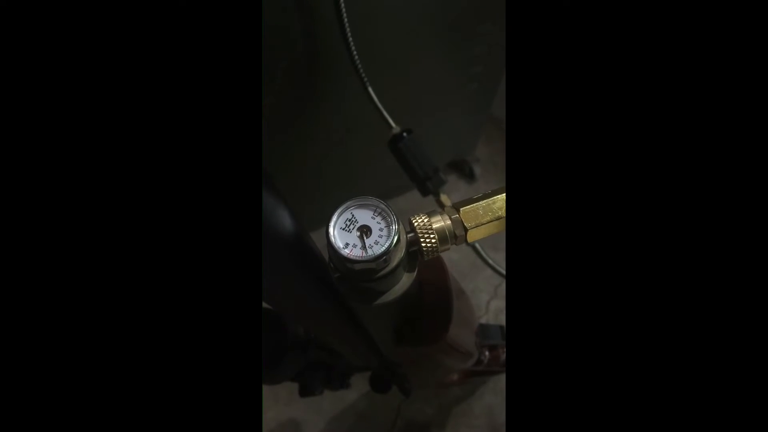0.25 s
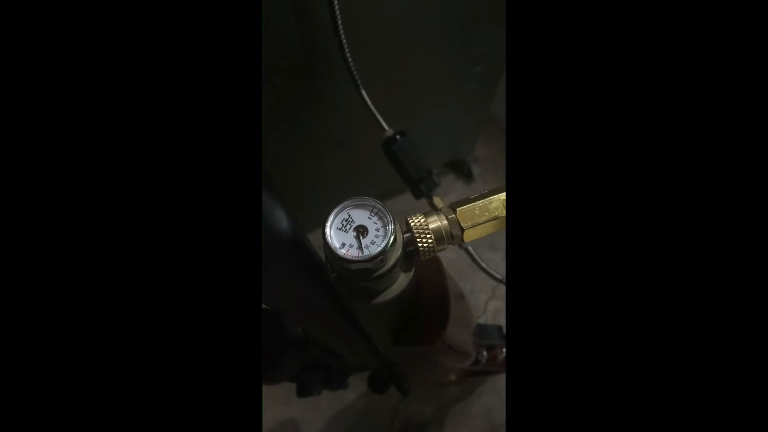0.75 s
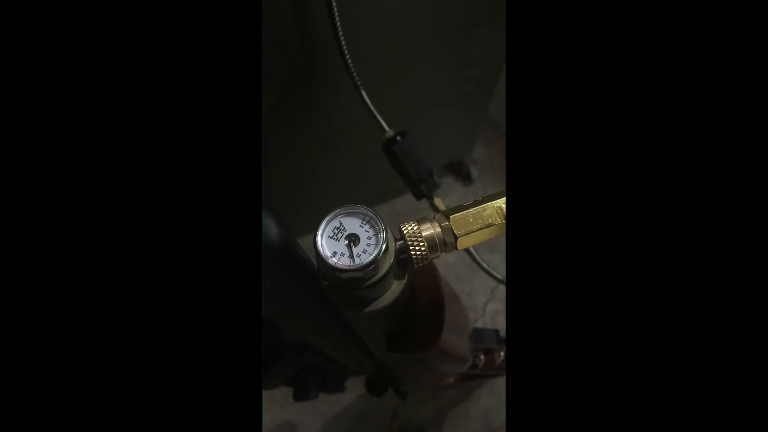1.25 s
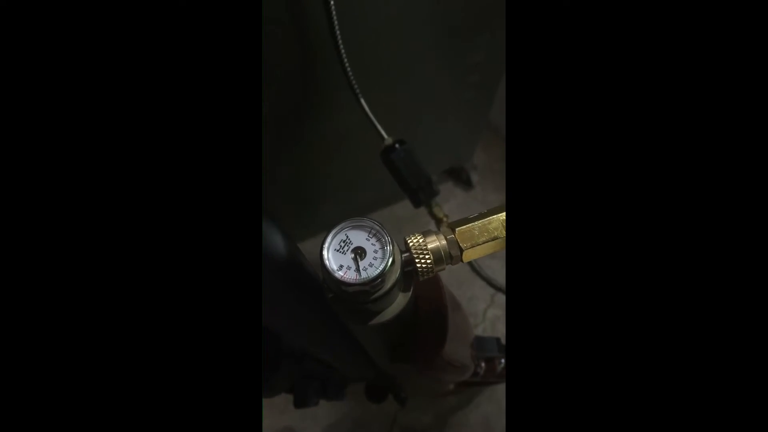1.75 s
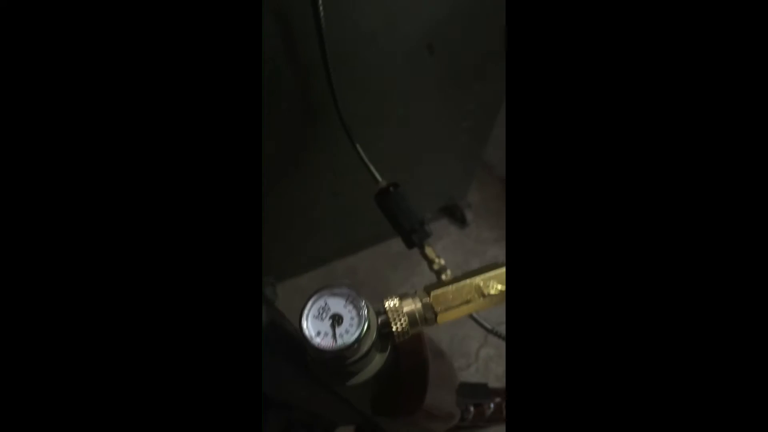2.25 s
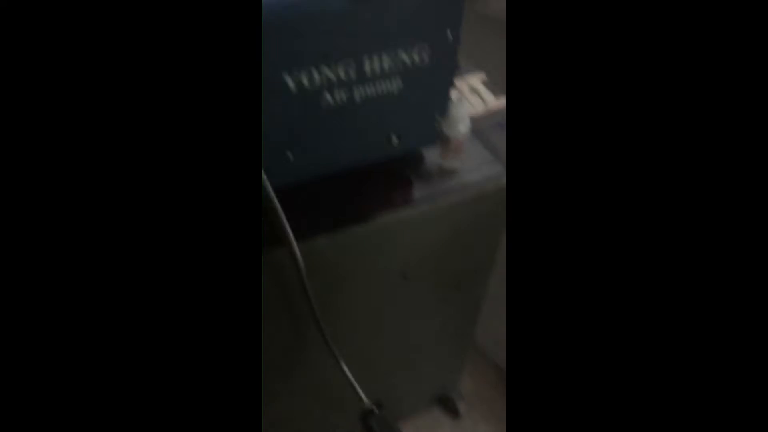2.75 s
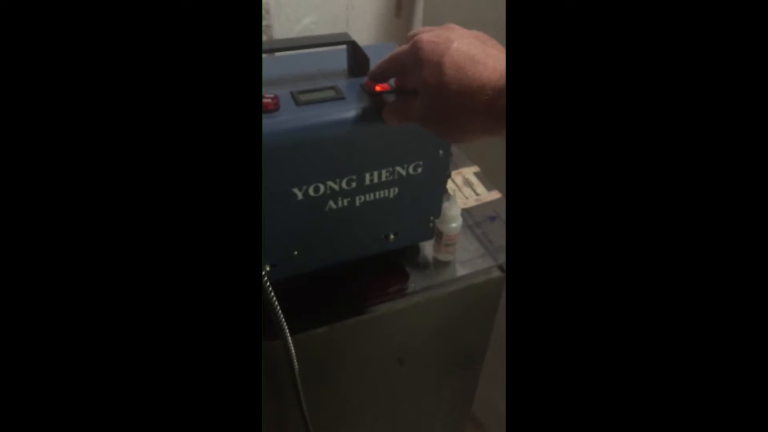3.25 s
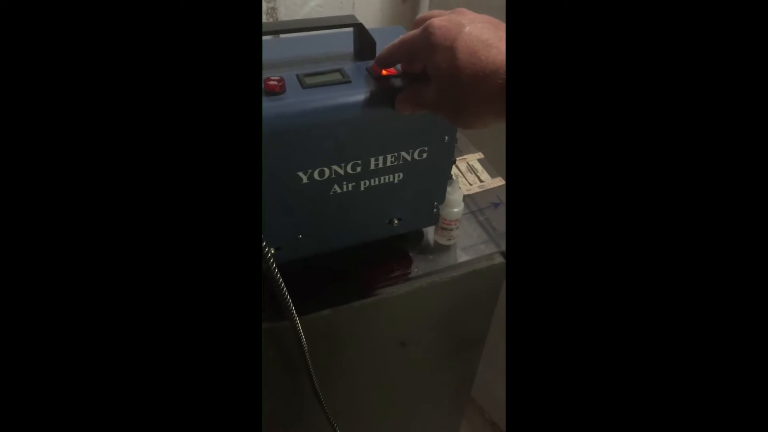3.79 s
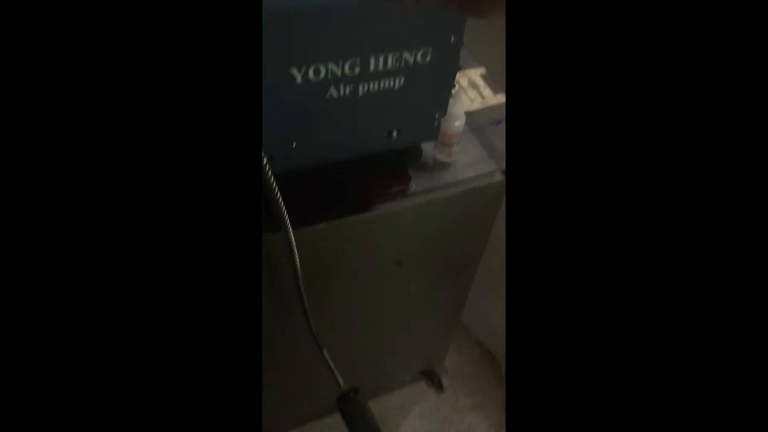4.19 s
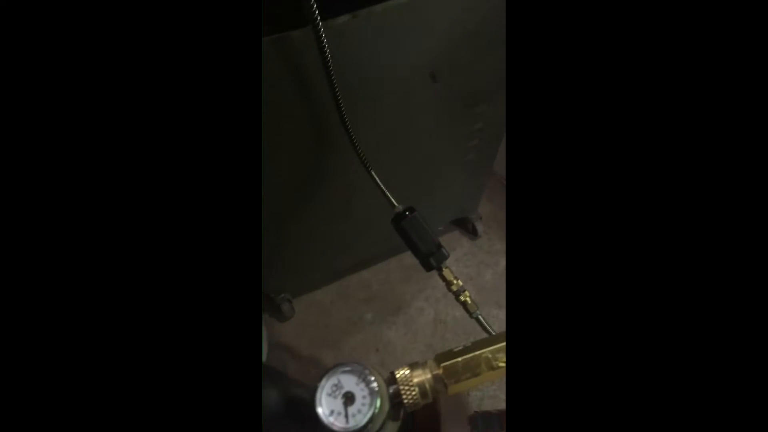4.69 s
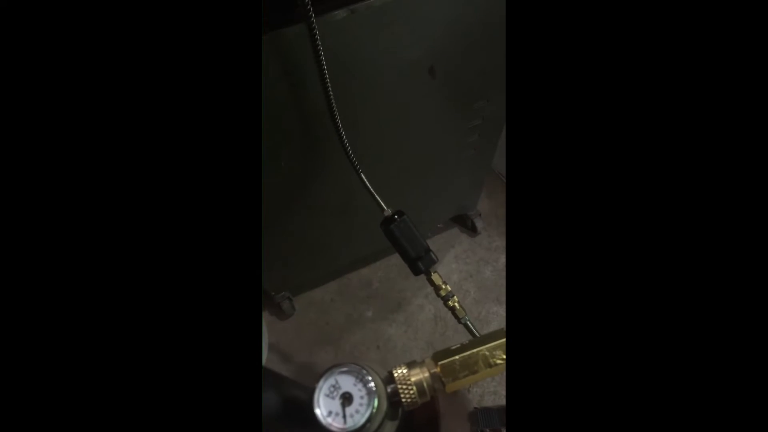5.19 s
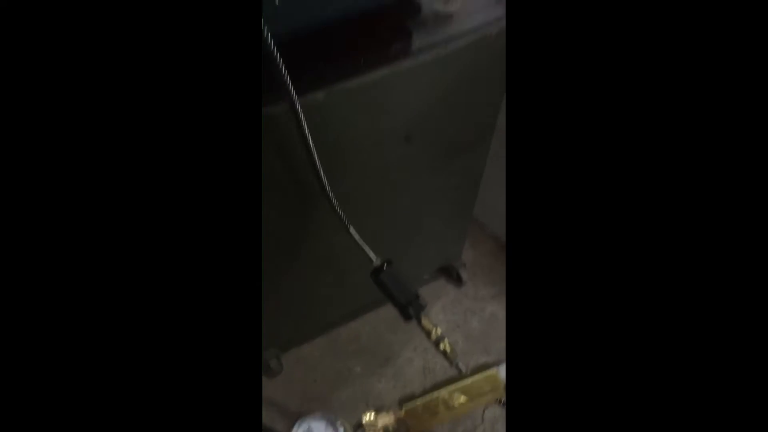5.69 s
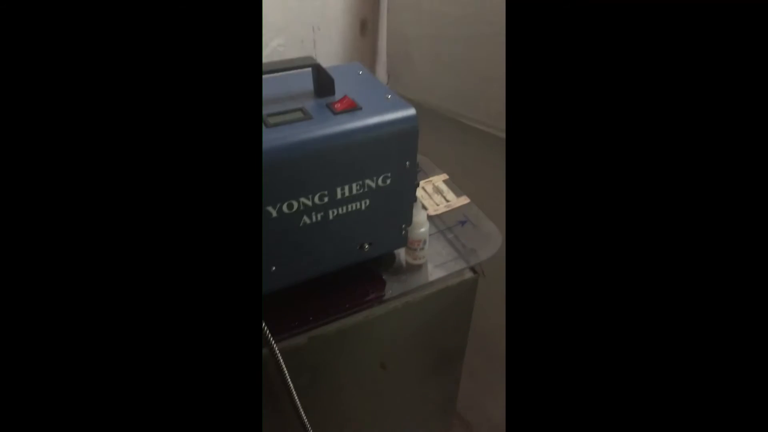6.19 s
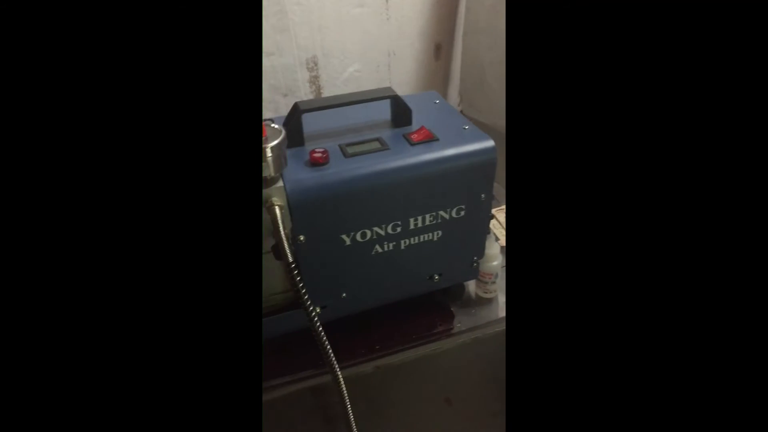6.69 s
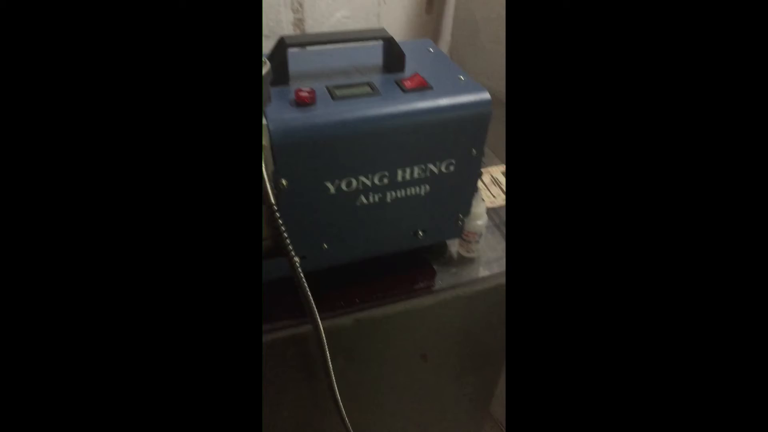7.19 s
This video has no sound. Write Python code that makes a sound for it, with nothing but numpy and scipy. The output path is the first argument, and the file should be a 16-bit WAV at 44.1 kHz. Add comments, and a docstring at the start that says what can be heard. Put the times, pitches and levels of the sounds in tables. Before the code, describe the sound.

A small high-pressure piston compressor runs at a fast, steady chug in a bare basement, with low droning, metallic knocking, buzz, clatter and hissing valves. The handheld microphone moves from the gauge to the switch and back toward the hose, subtly brightening and dulling the tone. Around five seconds the switch snaps; the machine shudders and thumps to rest. Soft scuffs, dry clicks and thin squeaks follow over low room hum.

```python
"""In a basement, a small high-pressure piston compressor runs, heard from its gauge and then from beside its switch.
Waves that repeat with each shaft turn make its push of air, drone, knock and buzz; pulsed noise makes
clatter, hiss and ticking valves. Switched off, it shudders to rest with fading noise and ringing thumps.
A few scuffs and clicks (short noise) and thin squeaks (gliding tones) follow over the hum of the room."""
import sys
import numpy as np
from scipy import signal
from scipy.fft import rfft, irfft, next_fast_len
from scipy.io import wavfile
from scipy.ndimage import map_coordinates

SR = 44100
rng = np.random.default_rng(int(sys.argv[2]) if len(sys.argv) > 2 else 0)


def waveform_to_disk(signal):
    """Save audio, clipped to [-1, 1], as 16-bit WAV at the path in sys.argv[1]."""
    frames = np.transpose(np.atleast_2d(signal))
    scaled = np.clip(frames, -1, 1) * 32767
    samples = np.round(scaled).astype(np.int16)
    wavfile.write(sys.argv[1], SR, samples)


N = 328104
TIME = np.arange(N) / SR  # seconds


def amp(db):
    """Turn decibels into gain."""
    return 10 ** (np.asarray(db) / 20)


def unit(x):
    """Scale x to an rms of 1."""
    return x / np.sqrt(np.mean(x ** 2) + 1e-20)


def along(points, hz):
    """Read a curve of (frequency, value) points on a log frequency axis."""
    f, v = np.transpose(points)
    return np.interp(np.log(hz + 1), np.log(f + 1), v)


def curves(rows):
    """Give one value per sample for each column after the time."""
    s, *cols = np.transpose(rows)
    return [np.interp(TIME, s, c) for c in cols]


def wobble(rate):
    """Draw a smooth random curve with `rate` knots a second."""
    knots = rng.standard_normal(int(N * rate / SR) + 4)
    return map_coordinates(knots, [TIME * rate])


def filtered(x, response):
    """Multiply the spectrum of x by a response of frequency."""
    size = next_fast_len(N + SR // 2)
    return irfft(rfft(x, size) * response(np.fft.rfftfreq(size, 1 / SR)), size)[:N]


def noise(spectrum):
    """Make noise of rms 1 with the given colour."""
    return unit(filtered(rng.standard_normal(N), lambda hz: amp(along(spectrum, hz))))


def ring(x, modes):
    """Let x excite (centre Hz, width Hz, dB) resonances, and scale the result to rms 1."""
    def response(f):
        return sum(amp(db) * 1j * f * width / (centre ** 2 - f * f + 1j * f * width)
                   for centre, width, db in modes)
    return unit(filtered(x, response))


def strikes(events, t60):
    """Envelope of sudden blows, each falling by 60 dB in t60 seconds."""
    return sum(amp(db - 60 * np.maximum(TIME - s, 0) / t60) * (TIME >= s) for s, db in events)


SHAFT_HZ = 55.5  # average turns a second under load
HUNT_HZ, HUNT_DEPTH_HZ = 9, .12  # how often and how far the speed swings
OFF_S, STOP_S = 5.062, 5.62  # power is cut; shaft stands still
VALVE_S = 3.2105  # a moment at which the first valve closes: the turn count is zero here


def shaft():
    """Turns made so far: the motor hunts slightly against the mains, then coasts to a stop."""
    speed = SHAFT_HZ + HUNT_DEPTH_HZ * np.sin(2 * np.pi * HUNT_HZ * TIME)
    slowing = np.clip((STOP_S - TIME) / (STOP_S - OFF_S), 0, 1)
    turns = np.cumsum(speed * slowing) / SR
    return turns - np.interp(VALVE_S, TIME, turns)


def each_turn(turns, at, decay, scatter_db, rise=.025):
    """Envelope struck once a turn, with rise and decay in shares of a turn and uneven strength."""
    count, since = np.divmod(turns - at + rise, 1)
    count = (count - count.min()).astype(int)
    strength = amp(scatter_db * rng.standard_normal(count.max() + 1))[count]
    return strength * np.exp(-(since - rise) / decay) * (1 - np.exp(-(since / rise) ** 2))


def repeating(turns, k, levels_db, nearness, at, scatter, size=4096):
    """Repeat one wave per turn, adding shaft multiples k aligned near one angle and mixing the places."""
    k = np.round(k)[:, None]
    angle = np.arange(size + 1) / size
    phase = scatter * rng.uniform(-1.064, 1, k.shape)  # a wide scatter spreads the wave over the turn
    cycles = amp(levels_db) @ np.sin(2 * np.pi * k * (angle - at) + phase)
    return sum(share * np.interp(turns % 1, angle, cycle) for share, cycle in zip(nearness, cycles))


# low push of air: (multiple of shaft speed, level at gauge [dB], level at switch [dB], level by hose [dB])
AIR_PUSH = [(1, -39, -42, -39.5), (2, -22, -22, -21.5), (3, -19, -18.5, -18.5), (4, -21.5, -20, -21.5),
            (5, -22.5, -20, -21.5), (6, -23.5, -36, -28.5), (7, -28.5, -20.5, -22.5)]


def air_push(turns, nearness):
    """Each stroke pushes air: the lowest multiples of the shaft speed, lined up near one angle."""
    multiples, *levels_db = np.transpose(AIR_PUSH)
    return repeating(turns, multiples, levels_db, nearness, at=.43, scatter=.65)


# resonances of the frame:
# (frequency [Hz], width [Hz], level at gauge [dB], level at switch [dB], level by hose [dB])
FRAME_MODES = [(510.6, 91, -29, -31.0, -30.5), (646, 60.0, -31.5, -28, -29.5),
               (801.7, 54.6, -24, -27.5, -25), (945, 120, -25, -24, -27.0), (1047, 92, -24, -30, -22.0),
               (1237, 76, -19, -25.5, -23.5), (1332.0, 110, -29.5, -33.5, -25.5),
               (1464, 130, -33, -30, -40.5), (1592, 60.0, -20.0, -26.5, -29.5),
               (1691, 52, -31.5, -20.5, -23.5), (1900, 87, -31.5, -29.5, -31)]


def frame_levels(k):
    """Level in dB of shaft multiples k at each place: those near a frame resonance stand out."""
    modes = np.array(FRAME_MODES)
    detune = (k * SHAFT_HZ - modes[:, :1]) / (modes[:, 1:2] / 2)
    return 10 * np.log10(amp(modes[:, 2:].T) ** 2 @ (1 + detune ** 2) ** -2.)


def frame_drone(turns, nearness, multiples):
    """The frame drones at shaft multiples spread loosely over the turn."""
    return repeating(turns, multiples, frame_levels(multiples), nearness, at=0.4976, scatter=np.pi)


def piston_knock(turns, nearness, multiples):
    """The piston excites higher frame tones, with slightly uneven timing and strength."""
    loose = turns + 0.0013 * wobble(70)  # play in the bearings shifts each knock a little
    wave = repeating(loose, multiples, frame_levels(multiples), nearness, at=.23, scatter=1.91)
    return wave * amp(1.2 * wobble(60))


# colour of the casing's buzz: (frequency [Hz], relative level [dB])
BUZZ_COLOUR = [(2000, -0.5), (2500, 3), (3100, -6.5), (3700, -10.5), (4600, -11.5), (6000, -20.5),
               (8000, -16)]


def casing_buzz(turns, nearness, multiples):
    """The casing buzzes at many high shaft multiples of random strength, unsteady in time and level."""
    spread_db = rng.uniform(-14, 9.7, (len(nearness), len(multiples)))
    levels_db = along(BUZZ_COLOUR, multiples * SHAFT_HZ) + spread_db
    unsteady = turns + 0.00048 * wobble(60)
    wave = unit(repeating(unsteady, multiples, levels_db, nearness, at=.5, scatter=np.pi))
    return amp(-28.5 + 2.0 * wobble(40)) * wave


def note(turns, nearness, count=16, order=37):
    """The periodic sound: push, drone, knock and buzz share out the multiples of the shaft speed."""
    low = np.arange(len(AIR_PUSH) + 1, count)
    middle = np.arange(count, order)
    high = np.arange(order, 4 * order)
    return (air_push(turns, nearness) + frame_drone(turns, nearness, low)
            + piston_knock(turns, nearness, middle) + casing_buzz(turns, nearness, high))


# colour of the loose parts: (frequency [Hz], relative level [dB])
CLATTER_COLOUR = [(40, -20.5), (100, -9.5), (220, -4), (600, -7.5), (950, -3), (1600, 1.5), (2000, -7),
                  (2700, -6), (4500, -21.5), (9000, -25), (16000, -43.5)]


def clatter(turns, close):
    """The piston shakes loose parts: noise that swells once a turn."""
    shake = 0.99 + each_turn(turns, at=0.14, decay=0.53, scatter_db=1.3, rise=0.11)
    return amp(-23.0 + close) * unit(shake * noise(CLATTER_COLOUR))


# ringing of the valve plates: (frequency [Hz], width [Hz], relative level [dB])
VALVE_MODES = [(6675, 56, 5.5), (6725, 50, -5.5), (6830, 44, 2), (5700, 81, -12), (8850, 430, -23)]
# valve blows within a turn: (share of a turn, relative level [dB])
VALVE_BLOWS = [(.0, -6.5), (.23, -6.5), (.5, -16)]


def valve_ring(turns, blows):
    """The plates snap shut at the same shaft angles every turn, and escaping air keeps them ringing."""
    snaps = sum(amp(db) * np.diff(np.floor(turns - at), prepend=np.floor(turns[0] - at))
                for at, db in VALVE_BLOWS)
    struck = ring(snaps * amp(1.0 * wobble(55)), VALVE_MODES)
    blown = ring(blows * rng.standard_normal(N), VALVE_MODES)
    return unit(struck + .45 * blown)


# colour of escaping air: (frequency [Hz], relative level [dB])
HISS_COLOUR = [(1500, -21.5), (3500, 4), (4800, -5.5), (5600, 5), (7500, -5), (9000, 2), (10300, -9.5),
               (12500, -6), (14000, -13.5), (16000, -14.5)]


def valve_sounds(turns, close):
    """Air hisses past the valves in bursts each turn, and the plates ring."""
    blows = sum(amp(db) * each_turn(turns, at=at, decay=0.1, scatter_db=3.0) for at, db in VALVE_BLOWS)
    leak_db = .7 * wobble(16)  # the valves never seat quite alike
    hiss = amp(-31.5 + 3.3 * close + leak_db) * unit((.6 + blows) * noise(HISS_COLOUR))
    ringing_db = -36.0 + 6.4 * close + leak_db + 0.52 * wobble(6.7)
    return hiss + amp(ringing_db) * valve_ring(turns, blows)


# where the listener is: (time [s], place: 0 at the gauge, 1 at the switch, 2 low by the hose)
LISTENER_PLACE = [(0, 0.085), (2.15, 0.052), (2.9, 1), (4.15, 0.85), (4.6, 1.97)]


def compressor(turns):
    """The machine under load, blended between listening places; its sound collapses at power-off."""
    place = np.clip(curves(LISTENER_PLACE)[0], 0, 2)
    nearness = [np.maximum(1 - np.abs(place - i), 0) for i in range(3)]
    close = nearness[1] + .5 * nearness[2]  # clatter and valves grow near the cylinder
    since_off = np.maximum(TIME - OFF_S, 0)
    steady = note(turns, nearness) + valve_sounds(turns, close)
    return steady * amp(-280 * since_off) + clatter(turns, close) * amp(-200 * since_off)  # dB/s


# colour of the room's rumble: (frequency [Hz], relative level [dB])
ROOM_COLOUR = [(20, -35.5), (50, -10.5), (90, -13.5), (160, -9), (240, -9.5), (340, -10.5), (430, -22),
               (800, -24.5), (1100, -22.5), (2000, -29), (4000, -34.5), (8000, -39), (16000, -45.5)]
ROOM_DB, ROOM_RISE_S, ROOM_RISE_DB_PER_S = -62.5, 6.5, 6  # the rumble swells from that time on


def background():
    """Room rumble and boom from noise, a mains hum tone, and a whine strongest near the machine's stop."""
    hum = amp(-62.0 + 1.5 * wobble(4)) * np.sin(2 * np.pi * 59.5 * TIME)
    whine_db = -72 + 10 * np.exp(-((TIME - 5.71) / 0.17) ** 2)
    whine_noise = noise([(1200, -35.5), (2150, -0.5), (3500, -28)])
    whine = amp(whine_db) * ring(whine_noise, [(2180, 100, 0)])
    boom_noise = noise([(100, -12.5), (280, 0.0), (600, -23.5)])
    boom = amp(-63.5) * ring(boom_noise, [(235.0, 20, -0.5), (348, 25, -6)])
    room_db = ROOM_DB + ROOM_RISE_DB_PER_S * np.maximum(TIME - ROOM_RISE_S, 0)
    return amp(room_db + wobble(11)) * noise(ROOM_COLOUR) + hum + whine + boom


# the last piston knocks: (time [s], relative level [dB])
LAST_KNOCKS = [(5.125, -16.5), (5.203, -22), (5.2408, -23.5), (5.277, -22.5), (5.3424, -27.5),
               (5.4232, -23.5), (5.46, -34), (5.518, -40), (5.59, -42.5), (5.72, -48.5)]


def aftermath(rise, t60):
    """Motion that builds up after each knock and dies away (seconds); the knocks add in power."""
    s, db = np.transpose(LAST_KNOCKS)[:, :, None]
    since = np.maximum(TIME - s, 0)
    return np.linalg.norm(amp(db - 60 * since / t60) * (1 - np.exp(-since / rise)), axis=0)


SWITCH_S, SWITCH_DB = 5.0484, -23  # the snap of the switch
SIGH_DB, SIGH_DB_PER_S = -44, 110.5  # fading air after the power is cut
PUFF_DB, PUFF_RISE_S, PUFF_T60 = -29.5, 0.0068, .27  # air let out by each last stroke


def switch_and_air():
    """The switch snaps, air still sighs past the valves, and each last stroke lets out a puff."""
    snap = strikes([(SWITCH_S, SWITCH_DB)], t60=.06)
    sigh = amp(SIGH_DB - SIGH_DB_PER_S * np.abs(TIME - OFF_S)) * (TIME > OFF_S)
    puffs = amp(PUFF_DB) * aftermath(PUFF_RISE_S, PUFF_T60)
    return (snap + sigh + puffs) * noise(HISS_COLOUR)


# colour of the rocking machine: (frequency [Hz], relative level [dB])
SHUDDER_COLOUR = [(25, -37), (55, -14), (80, -9), (130, -6.5), (200, 1.5), (260, -4), (300, -12),
                  (370, -9.5), (500, -27), (1000, -69)]
SHUDDER_DB, SHUDDER_RISE_S, SHUDDER_T60 = -10.5, .024, 0.49


def shudder(jolt):
    """The jolt and each last knock leave the machine rocking on its feet: low noise that dies away."""
    rocking = amp(SHUDDER_DB) * aftermath(SHUDDER_RISE_S, SHUDDER_T60)
    return (rocking + amp(-3) * jolt) * noise(SHUDDER_COLOUR)


# colour of the rattling parts: (frequency [Hz], relative level [dB])
RATTLE_COLOUR = [(250, -22.5), (420, -2.5), (600, 2), (760, -1.5), (1000, -3), (1600, -5), (2750, -10.5),
                 (6000, -24.5), (12500, -40.5), (16000, -49)]
RATTLE_DB, RATTLE_RISE_S, RATTLE_T60 = -14, 0.0068, .32


def rattle(turns):
    """Loose parts rattle after each knock, pulsing with the slowing strokes."""
    strokes = 0.94 + each_turn(turns, at=0.17, decay=.3, scatter_db=5.0)
    loose = amp(RATTLE_DB) * aftermath(RATTLE_RISE_S, RATTLE_T60) * strokes
    direct = amp(-14) * strikes(LAST_KNOCKS, t60=0.048)
    return (loose + direct) * noise(RATTLE_COLOUR)


# the cabinet under the machine: (average frequency [Hz], average relative level [dB], 60 dB decay [s])
CABINET_MODES = [(82.6, -8, 0.5), (145, 0.5, 0.21), (208, -6.5, 0.37), (367, -8.5, .25), (741, 2, 0.076),
                 (1460, -15.5, 0.18)]
HEFT_DB, HEFT_DB_PER_S = -18.5, 31  # thump gain at switch-off; slower strokes shake the cabinet harder


def thumps(detune=0.048):
    """Each knock rings the cabinet as dying tones of slightly different strengths and pitches."""
    out, t = np.zeros(N), np.arange(SR) / SR
    for s, db in LAST_KNOCKS:
        modes = [amp(level + rng.normal(0, 1.1) - 60 * t / t60)
                 * np.sin(2 * np.pi * hz * rng.normal(1, detune) * t)
                 for hz, level, t60 in CABINET_MODES]
        out[round(s * SR):][:len(t)] += amp(db) * sum(modes) * (1 - np.exp(-t / 0.003))
    heft = amp(HEFT_DB + HEFT_DB_PER_S * (np.clip(TIME, OFF_S, 5.45) - OFF_S))
    return heft * out


def coasting(turns):
    """The switch snaps; the machine rocks and rattles while the last strokes slow down."""
    jolt = strikes([(OFF_S, -17.5)], t60=0.26)  # the load drops off and everything loose shakes
    return switch_and_air() + jolt * noise(CLATTER_COLOUR) + rattle(turns) + shudder(jolt) + thumps()


# scuffs: (start [s], swell [s], hold [s], relative level [dB])
SCUFF_EVENTS = [(5.741, 0.094, 0.02, -43), (5.938, .042, .017, -33.5), (7.202, 0.051, .076, -41.5)]
# colour of the rubbing: (frequency [Hz], relative level [dB])
RUBBING_COLOUR = [(350, -52), (600, -18), (1410, -3), (1530, -7.5), (1660, -1), (2570, 1), (4160, -2),
                  (4840, -1.5), (16000, -22.5)]
# resonances of the rubbed surface: (frequency [Hz], width [Hz], relative level [dB])
SURFACE_MODES = [(1427, 68, -1.5), (1730, 110, 1), (3268, 60, -6.5), (4120, 150, 1)]
SCUFF_T60 = .14  # seconds for a scuff to fall by 60 dB


def scuffs():
    """Rubbing makes soft noise with a fast, grainy flicker."""
    rub = sum(amp(db - 60 * np.maximum(TIME - s - swell - hold, 0) / SCUFF_T60)
              * np.clip((TIME - s) / swell, 0, 1) ** 1.4
              for s, swell, hold, db in SCUFF_EVENTS)
    grains = rub * amp(2.4 * wobble(260))
    rubbed = np.clip(TIME - 6.2, 0, 1)  # the last scuff rings what it touches
    plain = amp(-3.5 - 3.5 * rubbed) * noise(RUBBING_COLOUR)
    ringing = amp(-12.5) * rubbed * ring(rng.standard_normal(N), SURFACE_MODES)
    return grains * (plain + ringing)


# light clicks: (time [s], relative level [dB])
CLICK_EVENTS = [(5.9808, -18.5), (6.0048, -17.5), (6.0234, -25.5), (7.2245, -42.5), (7.2434, -44),
                (7.3208, -27.5)]
# colour of the clicks: (frequency [Hz], relative level [dB])
CLICK_NOISE = [(300, -51), (600, -30.5), (850, -12), (1500, -12), (2300, 1), (3000, 2), (3900, -5.5),
               (6500, -6.5), (11300, -17.5), (16000, -24)]


def clicks():
    """Dry clicks: bursts of noise with a quick decay and a slower, softer one."""
    snap = amp(-11.5) * strikes(CLICK_EVENTS, t60=0.02) + amp(-15.0) * strikes(CLICK_EVENTS, t60=0.079)
    return snap * noise(CLICK_NOISE)


# squeaks: (start [s], length [s], first pitch [Hz], middle pitch [Hz], last pitch [Hz], level [dB])
SQUEAK_EVENTS = [(6.572, 0.1, 2470, 2490, 2470, -54.5), (6.684, 0.049, 2470, 2500, 2500, -57),
                 (6.885, .1, 2740, 2855, 2780, -59), (6.997, .046, 2730, 2650, 2660, -58),
                 (7.05, .08, 2650, 2670, 2660, -71), (7.335, .03, 2720, 2695, 2680, -54)]


def squeaks():
    """Thin whistles: single tones that glide through three pitches with a slight flutter."""
    out = np.zeros(N)
    for s, length, first_hz, middle_hz, last_hz, db in SQUEAK_EVENTS:
        u = np.clip((TIME - s) / length, 0, 1)  # share of the squeak gone by
        glide = np.interp(u, [0, .5, 1], [first_hz, middle_hz, last_hz])
        hz = glide * (1 + 0.0084 * wobble(220))
        swell = np.sqrt(np.abs(np.sin(np.pi * u)))
        out += amp(db) * swell * np.sin(2 * np.pi * np.cumsum(hz) / SR)
    return out


# echo of the bare walls: (frequency [Hz], 60 dB decay [s])
WALL_DECAY = [(150, 0.7), (2000, 0.13), (12000, 0.2)]


def basement(x):
    """The bare walls answer with a tail of noise whose bass lasts longest."""
    hz, t, z = signal.stft(rng.standard_normal(SR // 2), SR, nperseg=256)
    decay = amp(-60 * t / along(WALL_DECAY, hz)[:, None])
    tail = signal.istft(z * decay, SR, nperseg=256)[1]
    return signal.fftconvolve(x, tail / np.linalg.norm(tail))[:N]


def scene():
    """The compressor, its run-down and the small sounds after it, in one room."""
    turns = shaft()
    small = coasting(turns) + scuffs() + clicks() + squeaks()
    return (compressor(turns) + small + amp(-10.5) * basement(small) + background())[None]


TOP_HZ = 15850  # band limit


def record(dry, top=1.0, hardness=7):
    """Round off the highest peaks and keep nothing at or above the band limit."""
    rounded = dry / (1 + np.abs(dry / top) ** hardness) ** (1 / hardness)
    return np.array([filtered(channel, lambda hz: hz < TOP_HZ) for channel in rounded])


dry = scene()
out = record(dry)
waveform_to_disk(out)
```